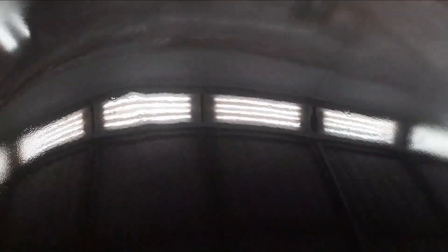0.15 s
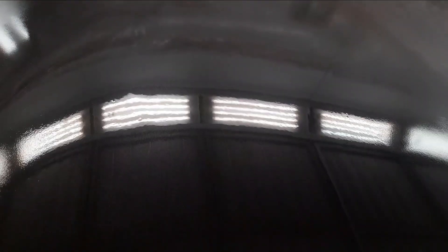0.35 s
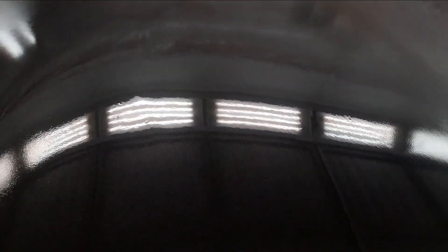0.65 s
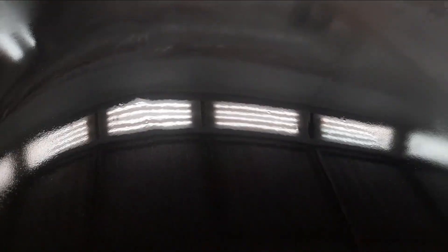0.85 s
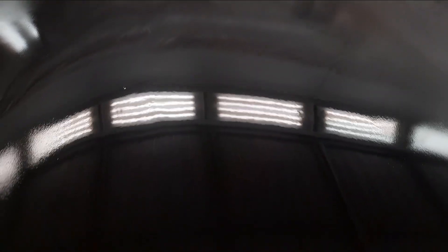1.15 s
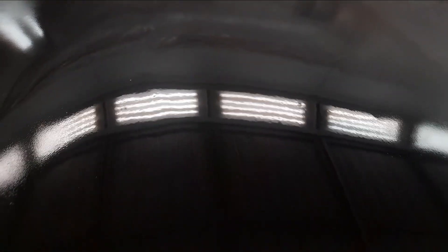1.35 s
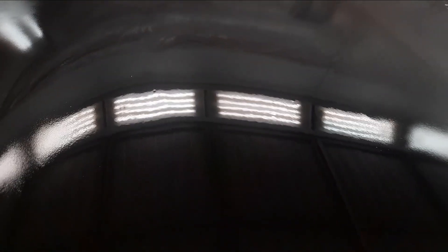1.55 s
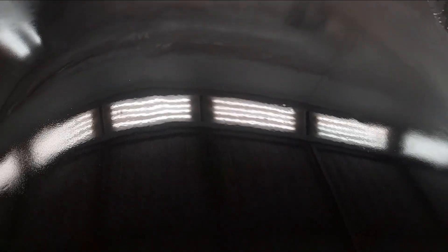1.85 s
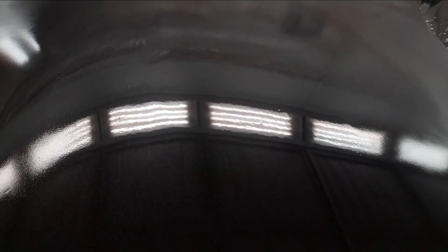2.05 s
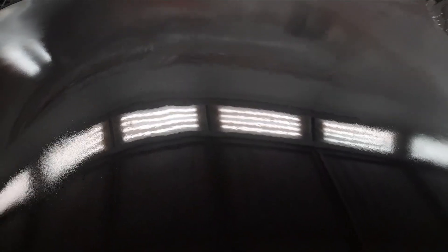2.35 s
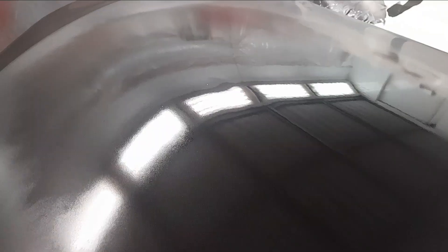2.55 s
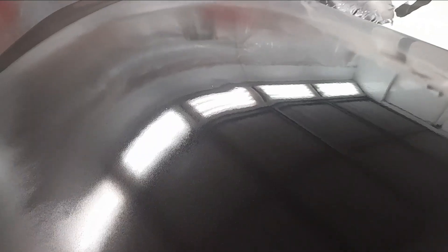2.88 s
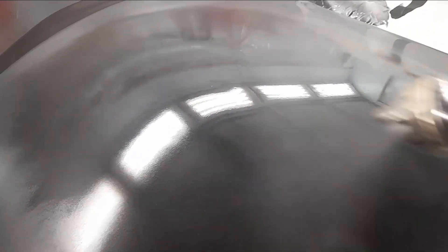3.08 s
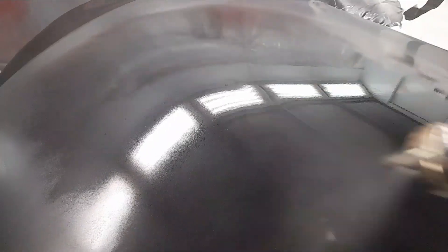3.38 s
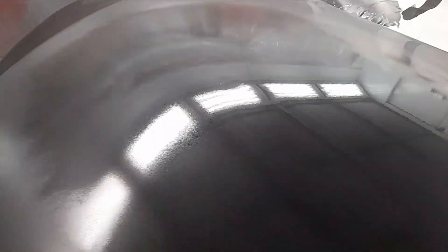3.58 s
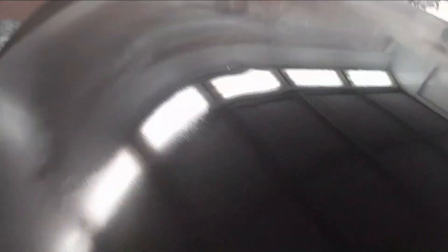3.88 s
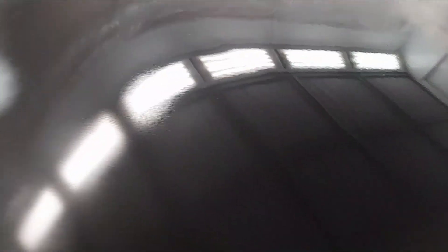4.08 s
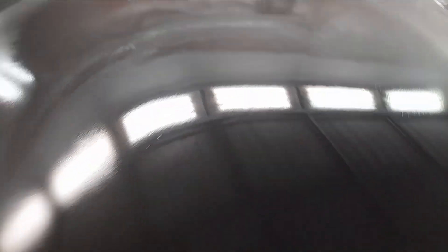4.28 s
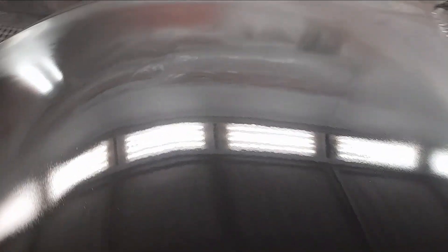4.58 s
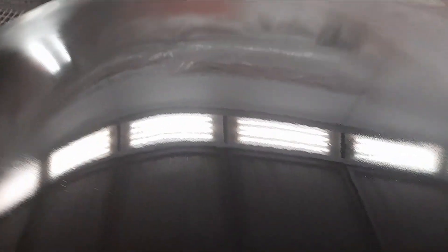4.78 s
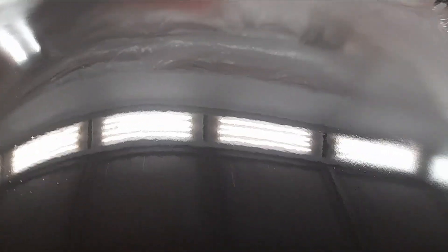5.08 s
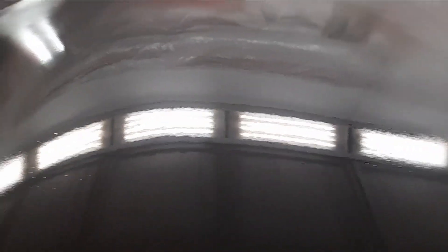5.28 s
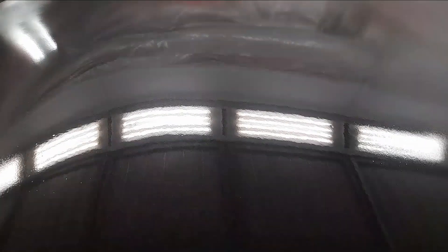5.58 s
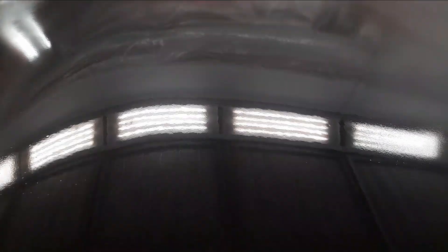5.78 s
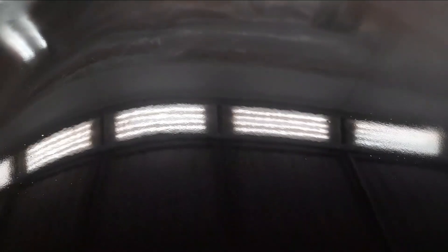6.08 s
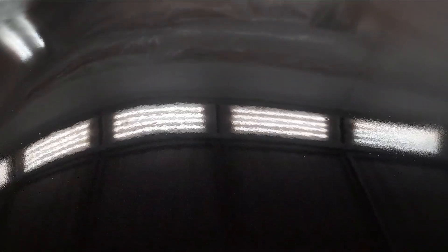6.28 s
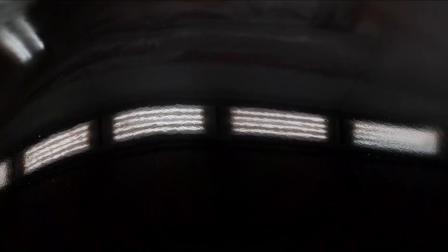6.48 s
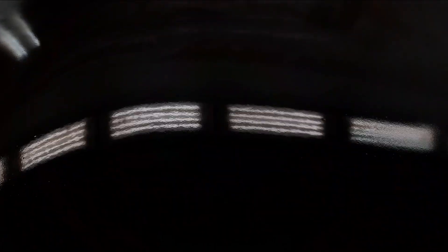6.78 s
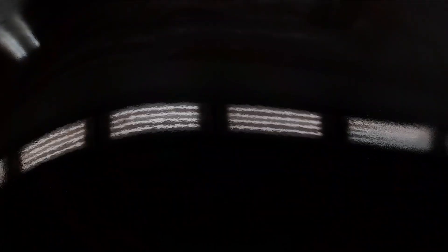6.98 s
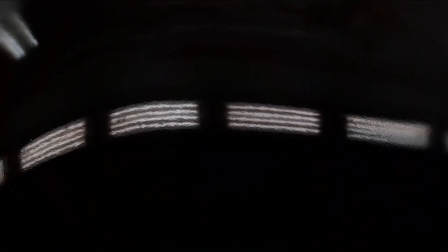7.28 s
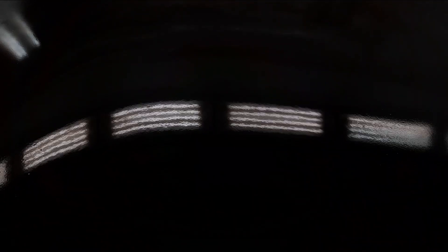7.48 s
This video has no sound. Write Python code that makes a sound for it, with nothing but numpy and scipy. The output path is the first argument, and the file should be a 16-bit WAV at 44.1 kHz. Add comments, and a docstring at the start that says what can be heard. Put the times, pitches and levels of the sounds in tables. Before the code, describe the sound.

A close stereo microphone in a ventilated workshop booth picks up dull airflow rumble, fan hum and a very quiet high hiss. Low puffs buffet it. A spray gun snaps on loudly, its bright hiss shifting in colour as it sweeps past, then shuts with a tiny spit. The room is briefly subdued, clicks sound hard left, and the rumble gradually returns with more puffs.

```python
"""A paint booth runs throughout: filtered noise for duct rumble and air, a wavering sine for the fan's hum.
From the start a spray gun leaks a thin combed hiss, and puffs of low noise buffet the microphone.
Near 3 s the gun sprays for about a second, sweeping close past: noise combed by a sliding panel echo.
The valve spits as it seats, leftover air bleeds off, then near 5 s a finger taps the case: ringing clicks.
The recorder's gain control ducks the booth under the burst, holds over a second, then lets it swell back."""
import sys
import numpy as np
from scipy import signal
from scipy.fft import rfft, irfft, next_fast_len
from scipy.io import wavfile
from scipy.ndimage import uniform_filter1d, minimum_filter1d

SR = 44100
rng = np.random.default_rng(int(sys.argv[2]) if len(sys.argv) > 2 else 0)


def transcribe(u):
    """Save the signal u as a 16-bit wav file named by the first command-line argument.

    u: samples, shape (n,) or (channels, n), limited to [-1, 1]; the rate is SR.
    q: integer samples, one column per channel.
    """
    v = np.clip(np.atleast_2d(u).T, -1, 1)
    q = np.round(v * 32767).astype(np.int16)
    wavfile.write(sys.argv[1], SR, q)


N = 336917
TIME = np.arange(N) / SR
FFT_SIZE = next_fast_len(N + 4096, real=True)
FREQS = np.maximum(np.arange(FFT_SIZE // 2 + 1) * SR / FFT_SIZE, 1)
CUTOFF_HZ = 15500


def from_db(db):
    """Decibels to gain."""
    return 10 ** (np.asarray(db) / 20)


def rms_one(x):
    """Scale to unit rms."""
    return x / np.sqrt(np.mean(x ** 2) + 1e-20)


def over_hz(points):
    """A table joined by straight lines on a log-frequency axis."""
    hz, value = np.transpose(points)
    return np.interp(np.log(FREQS), np.log(hz), value)


def in_time(rows):
    """The columns of a table, joined by straight lines in time."""
    start_s, *columns = np.transpose(rows)
    return [np.interp(TIME, start_s, column) for column in columns]


def bell(centre_hz, width_hz):
    """Resonance-shaped curve over frequency: 1 on top, full width taken at half height."""
    return 1 / (1 + (2 * (FREQS - centre_hz) / width_hz) ** 2)


def hump(peak_s, length_s):
    """A smooth rise to 1 at a given moment, and the same fall."""
    return np.exp(-((TIME - peak_s) / length_s) ** 2)


def opened(start_s, attack_s):
    """Air let in: 0 before, a straight rise to 1 over the attack."""
    return np.clip((TIME - start_s) / attack_s, 0, 1)


def dying(start_s, db_per_s):
    """Full strength until a given moment, then a steady fall in dB, down to -200 dB."""
    return from_db(-np.minimum(db_per_s * np.maximum(TIME - start_s, 0), 200))


def panned(balance_db):
    """Left and right gains for a left-minus-right difference, at constant power."""
    gains = from_db(np.array([[.5], [-.5]]) * balance_db)
    return gains / np.sqrt(np.mean(gains ** 2, axis=0))


def noise(gain, likeness=0):
    """Stereo turbulence with a given spectrum and left-right likeness; rms 1."""
    mid, side = rfft(rng.standard_normal((2, FFT_SIZE)))
    common = np.sqrt(1 + likeness) * mid
    opposed = np.sqrt(1 - likeness) * side * [[1], [-1]]
    return rms_one(irfft((common + opposed) * gain, FFT_SIZE)[:, :N])


def drift(rate_hz):
    """Slow random wander, rms 1, its spectrum halved at the given rate."""
    spectrum = rfft(rng.standard_normal(FFT_SIZE))
    return rms_one(irfft(spectrum * bell(0, 2 * rate_hz), FFT_SIZE)[:N])


def butter(x, edge_hz, kind, order=2):
    """Butterworth low- or high-pass."""
    return signal.sosfilt(signal.butter(order, edge_hz, kind, fs=SR, output="sos"), x)


def peak_band(x, centre_hz, width_hz):
    """The part of a sound that one resonance picks out."""
    return signal.lfilter(*signal.iirpeak(centre_hz, centre_hz / width_hz, fs=SR), x)


def delayed(x, lag_ms, oversampling=4):
    """A sound heard over a longer path, which may change; read on a finer grid to keep its treble."""
    fine = signal.resample_poly(x, oversampling, 1)
    position = (TIME - lag_ms / 1000) * SR * oversampling
    return np.interp(position, np.arange(len(fine)), fine)


# booth air, relative spectrum: (pitch_hz, level_db)
DRAUGHT_COLOUR = [(20, -39), (38, -12.5), (60, -2.5), (112, -4.5), (133, -12.5), (150, -12.5), (195, -9.5),
                  (250, -13), (350, -18.5), (600, -26.5), (1000, -26.5), (1450, -28.5), (1650, -28),
                  (1850, -26.5), (2150, -27), (2300, -30), (2480, -33), (2900, -37), (5000, -51),
                  (9000, -70)]
# duct resonances: (pitch_hz, width_hz, lift_db)
DUCT_MODES = [(60.2, 6.7, 4), (118, 8, 1.5), (154.2, 14.3, 6), (173, 8.1, 3.5), (240, 10, 0.5),
              (261, 10.4, 3.5), (307, 14, 1.5), (417.6, 33, 5), (495, 21, 5), (562, 15.6, 5.5),
              (693, 43, 7.5), (768, 23, 3.5), (840, 12, 2), (925, 29, 5), (974, 45, 4), (2120, 82, 1)]
# booth air at the two ports: (pitch_hz, likeness -1..1)
BOOTH_ALIKE = [(60, .92), (160, .92), (270, .88), (450, .74), (740, .68), (1150, .4), (2000, .2), (4000, 0)]
# booth air: (pitch_hz, left_minus_right_db)
BOOTH_PAN = [(60, 1.5), (130, 0), (270, 4), (450, 2), (1200, 0), (1900, 7.5), (3200, -3.5), (6000, 3)]
# extractor on the left, so its rush reaches that port first: (pitch_hz, left_lead_rad)
BOOTH_LEAD = [(300, 0), (700, 0.38), (1150, 1.52), (1500, 2.18), (2300, 1.5)]
DRAUGHT_DB = -23.5


def draught(gust_db):
    """Extracted air rumbles through the ducts: noise coloured by their resonances."""
    duct_db = sum(lift_db * bell(pitch_hz, width_hz) for pitch_hz, width_hz, lift_db in DUCT_MODES)
    colour = from_db(over_hz(DRAUGHT_COLOUR) + duct_db)
    arrival = np.exp(-1j * over_hz(BOOTH_LEAD) * [[0], [1]])
    air = noise(colour * panned(over_hz(BOOTH_PAN)) * arrival, over_hz(BOOTH_ALIKE))
    return from_db(DRAUGHT_DB + gust_db * drift(1.8)) * air


# bands of booth noise that swell for a while: (peak_s, length_s, pitch_hz, width_hz, level_db)
BAND_SWELLS = [(2.742, 0.28, 845, 170, -42.5), (4.1, 0.35, 695, 45, -41.5), (6.703, .7, 83, 30, -32)]


def swelling_bands(likeness):
    """Bands of booth noise come and go: hollow ones, then a low rumble."""
    out = np.zeros((2, N))
    for peak_s, length_s, pitch_hz, width_hz, level_db in BAND_SWELLS:
        band = noise(bell(pitch_hz, width_hz), likeness)
        out += from_db(level_db) * hump(peak_s, length_s) * band
    return out


# hum level over time, uneven, lower during the burst: (start_s, change_db)
HUM_LEVEL = [(0, 0), (.3, 2), (.75, -1), (1.1, 1), (1.55, -2), (2.4, 1.5), (2.93, 1), (3.08, -8),
             (3.35, -2), (4.1, -4), (4.8, -1), (5.2, -1.5), (5.75, 1), (6.08, -4), (6.4, 0), (7.45, 0.8)]
FAN_HZ, FAN_DB = 220.62, -27.5


def fan(waver, waver_hz, balance_db):
    """The steady blade tone; uneven inflow shakes its strength and phase a little."""
    change_db, = in_time(HUM_LEVEL)
    unsteady = 1 + waver * (drift(waver_hz) + 1j * drift(waver_hz))
    tone = np.real(unsteady * np.exp(2j * np.pi * FAN_HZ * TIME))
    return from_db(FAN_DB + change_db) * rms_one(tone) * panned(balance_db)


# moving air brushing the microphone: (peak_s, level_db, length_s)
AIR_PUFFS = [(0.214, -21.5, 0.056), (0.458, -13.5, 0.024), (0.716, -19, 0.025), (0.895, -20, 0.046),
             (2.125, -22, 0.04), (2.4, -25, 0.021), (2.498, -24, 0.025), (2.722, -33, 0.059),
             (5.427, -16, 0.022), (5.516, -22.5, 0.035), (5.721, -15, 0.017), (6.373, -17.5, 0.054),
             (7.49, -23, 0.048)]


def puffs(centre_hz, width_hz, likeness, balance_db):
    """Each puff is a brief swell of soft, low buffeting."""
    swell = sum(from_db(level_db) * hump(peak_s, length_s) for peak_s, level_db, length_s in AIR_PUFFS)
    buffeting = butter(noise(bell(centre_hz, width_hz), likeness), 56, "high", order=4)
    return swell * buffeting * panned(balance_db)


def ring(clicks, pitch_hz, t60_s):
    """A decaying resonator: a unit click sets a sine of height 1 ringing."""
    decay = from_db(-60 / (t60_s * SR))
    step_rad = 2 * np.pi * pitch_hz / SR
    return signal.lfilter([0, np.sin(step_rad)], [1, -2 * decay * np.cos(step_rad), decay ** 2], clicks)


# tap on the case by the left port, its rebound, a light touch: (start_s, tick_peak_db, brightness_hz)
CASE_TAPS = [(5.0589, -6, 5960), (5.0620, -13, 1700), (5.23, -20, 900)]
# ringing of the case, relative: (pitch_hz, level_db, t60_s)
CASE_MODES = [(108.5, -3, 0.092), (450, -29, 0.01), (1350, -21, .008), (2000, -21, .007), (4200, -28, .006),
              (5900, -24, 0.0043), (10400, -28, .004), (11640, -33, .006)]


def knock(balance_db):
    """Sharp contacts, each a tick followed by a short ring and a low thud."""
    out = np.zeros(N)
    for start_s, tick_peak_db, brightness_hz in CASE_TAPS:
        click = np.zeros(N)
        click[round(start_s * SR)] = 1
        tick = butter(click, brightness_hz, "low")
        body = sum(from_db(level_db) * ring(tick, pitch_hz, t60_s) for pitch_hz, level_db, t60_s in CASE_MODES)
        out += from_db(tick_peak_db) * (tick / tick.max() - body)
    return out * panned(balance_db)


# trigger: pulled once, held, let go
OPEN_S, ATTACK_S, CLOSE_S, RELEASE_DB_PER_S = 2.971, .009, 4.105, 700
THIN_HZ, THIN_WIDTH_HZ, THIN_START_DB, THIN_DB_PER_S = 9030, 1800, 4.5, 1.1


def thinning(x):
    """One band of a hiss starts strong and fades away."""
    band_gain = from_db(THIN_START_DB - THIN_DB_PER_S * TIME)
    return x + (band_gain - 1) * peak_band(x, THIN_HZ, THIN_WIDTH_HZ)


def bleed(level_db, fall_db_per_s):
    """Level of the extra air that bleeds off once the trigger is let go."""
    return from_db(level_db) * opened(CLOSE_S, ATTACK_S) * dying(CLOSE_S, fall_db_per_s)


# idle gun's leak, relative spectrum: (pitch_hz, level_db)
LEAK_SPECTRUM = [(2000, -18), (4000, -12), (6300, -11.5), (8400, -10), (9500, -6), (11200, -.5),
                 (13300, 3.5), (15500, 1.5)]
# leak at the two ports: (pitch_hz, left_minus_right_db)
LEAK_PAN = [(8000, -7.5), (11200, 2), (13300, 3.5), (15500, -12)]
# idle gun over the panel, air cap turning slowly:
# (start_s, hiss_change_db, left_minus_right_db, left_echo_lag_ms, right_echo_lag_ms)
GUN_PATH = [(0, 0, 0, 0.53, 0.25), (1.1, 0, -0.5, .45, .245), (1.35, 3, 2, .46, .26),
            (1.65, 2.5, 0, 0.44, 0.28), (2.05, 1, 1, .53, 0.3), (2.5, 1, 2, .55, 0.31),
            (2.9, -2, -2, .555, .328), (4.4, -4, -1, .45, 0.25), (5.1, -3, 3, 0.37, .26),
            (5.65, 0, 5, 0.45, .265), (6.25, -.5, 4, .415, 0.3), (6.5, 1, 6.5, .45, .275),
            (7.6, 1, 4, .45, 0.29)]
HISS_DB, BLEED_HISS_DB, BLEED_HISS_FALL_DB_PER_S = -49, -45, 31
# the rush fades as the gun draws away
RUSH_DB, RUSH_FADE_DB_PER_S = -60.5, 0.5
BLEED_RUSH_DB, BLEED_RUSH_FALL_DB_PER_S = -54, 8


def leak(flutter_db, rush_hz, rush_width_hz, rush_balance_db, echo_share):
    """A thin high hiss from the air cap, combed by its echo off the panel, over a slowly fading lower rush."""
    change_db, balance_db, *lags_ms = in_time(GUN_PATH)
    direct = noise(from_db(over_hz(LEAK_SPECTRUM)) * panned(over_hz(LEAK_PAN)))
    combed = np.array([side + echo_share * delayed(side, lag_ms) for side, lag_ms in zip(direct, lags_ms)])
    # idle and bled air add in power
    hiss_level = np.hypot(from_db(HISS_DB + change_db), bleed(BLEED_HISS_DB, BLEED_HISS_FALL_DB_PER_S))
    hiss = hiss_level * combed * panned(balance_db)
    idle_rush_level = from_db(RUSH_DB - RUSH_FADE_DB_PER_S * TIME)
    rush_level = np.hypot(idle_rush_level, bleed(BLEED_RUSH_DB, BLEED_RUSH_FALL_DB_PER_S))
    rush = rush_level * noise(bell(rush_hz, rush_width_hz)) * panned(rush_balance_db)
    return thinning(hiss + rush) * from_db(flutter_db * drift(12))


SPIT_S, SPIT_ATTACK_S, SPIT_DB, SPIT_DB_PER_S = 4.16, .0015, -31, 750


def spit(centre_hz, width_hz, balance_db):
    """The needle seats with a last sharp tick of air."""
    puff = from_db(SPIT_DB) * opened(SPIT_S, SPIT_ATTACK_S) * dying(SPIT_S, SPIT_DB_PER_S)
    return puff * noise(np.sqrt(bell(centre_hz, width_hz))) * panned(balance_db)


# pressure sags while the trigger is held; leftover air drains after it shuts
SAG_DB_PER_S, DRAIN_DB, DRAIN_DB_PER_S = 2.34, -16, 128


def valve():
    """Flow through the gun: it snaps on, sags a little, is cut off and drains."""
    cut_off = dying(CLOSE_S, RELEASE_DB_PER_S)
    drain = from_db(DRAIN_DB) * dying(CLOSE_S, DRAIN_DB_PER_S)
    return opened(OPEN_S, ATTACK_S) * dying(OPEN_S, SAG_DB_PER_S) * np.maximum(cut_off, drain)


# closest approach
PASS_S, PASS_LENGTH_S = 3.675, 0.24


def sweep(far, closest):
    """A quantity that follows the gun's nearness, which falls with the square of its distance."""
    nearness = 1 / (1 + ((TIME - PASS_S) / PASS_LENGTH_S) ** 2)
    return far + (closest - far) * nearness


def glints(x, share, count=4):
    """Weak reflections from hand, gun and panel leave a slight ripple in the colour."""
    lags = (rng.uniform(.001, .004, count) * SR).astype(int)
    return x + share * sum(np.roll(x, lag) for lag in lags)


def churned(x, depth_db, rate_hz, count=12):
    """Eddies make each band of a jet surge and sink on its own."""
    place = np.interp(FREQS, [1500, CUTOFF_HZ], [0, count - 1])
    spectrum = rfft(x, FFT_SIZE)
    out = np.zeros((2, N))
    for k in range(count):
        overlap = np.maximum(1 - np.abs(place - k), 0)
        band = irfft(spectrum * overlap, FFT_SIZE)[:, :N]
        out += band * from_db(depth_db * drift(rate_hz))
    return out


# spraying jet, relative spectrum: (pitch_hz, level_db)
JET_SPECTRUM = [(300, -17), (1200, -8.5), (1850, -2), (2400, -3), (3000, -5), (3900, -1.0), (4800, -3),
                (6000, 2.5), (7200, 4.5), (8100, 4.5), (9200, -0.5), (11300, 3), (13300, 2.5), (15500, 1.5)]
# jet at the two ports: (pitch_hz, left_minus_right_db)
JET_PORT_PAN = [(1000, 0), (1800, 2.5), (3200, -1.5), (4700, -2.5), (6200, 3), (7200, 9), (8000, 5.5),
                (9200, 0), (11000, -2), (13000, -3), (15500, -8)]
# share of the jet common to both ports, the rest diffuse: (pitch_hz, likeness 0..1)
JET_ALIKE = [(1000, 0.7), (2000, 0.7), (2900, 0.9), (3900, 0.55), (4800, .3), (6200, 0.3), (11000, 0.3),
             (15000, 0.1)]
# each pair: gun far, gun closest; levels before the valve's sag
JET_DB, SIZZLE_DB = (-15, -13.5), (-36, -19)
JET_PAN_DB, ECHO_LAG_MS = (-2, -0.5), (0.35, 0.89)
# gun on the right, so its direct sound reaches the left port later
PORT_LAG_MS = (0.527, 0.262)


def spray(echo_share, sizzle_hz, sizzle_width_hz, sizzle_balance_db, flutter_db):
    """The jet's hiss; its echo off the panel, on the left, combs it with notches that slide as the gun moves."""
    colour = from_db(over_hz(JET_SPECTRUM))
    left, right = noise(colour * panned(over_hz(JET_PORT_PAN)), over_hz(JET_ALIKE))
    left = delayed(left, sweep(*PORT_LAG_MS))
    dull = butter(left, 6400, "low")
    left = left + echo_share * delayed(dull, sweep(*ECHO_LAG_MS))
    scattered = np.array([glints(side, share=.08) for side in (left, right)])
    jet = from_db(sweep(*JET_DB)) * scattered * panned(sweep(*JET_PAN_DB))
    # a narrower band flares up as the fan of air glances off the panel towards the microphone
    glancing = noise(bell(sizzle_hz, sizzle_width_hz) * panned(sizzle_balance_db))
    sizzle = from_db(sweep(*SIZZLE_DB)) * glancing
    burst = (jet + sizzle) * valve() * from_db(flutter_db * drift(25))
    return churned(burst, depth_db=.65, rate_hz=16)


def scene():
    """Booth and gun together, with wind and taps at the microphone."""
    booth = draught(gust_db=0.23) + swelling_bands(likeness=1.0)
    hum = fan(waver=0.12, waver_hz=5, balance_db=-1.0)
    wind = puffs(centre_hz=65.4, width_hz=70, likeness=0.89, balance_db=4.5)
    taps = knock(balance_db=37)
    idle = leak(flutter_db=0.5, rush_hz=5900, rush_width_hz=2600, rush_balance_db=3.5, echo_share=0.23)
    seating = spit(centre_hz=8510, width_hz=10000, balance_db=6)
    burst = spray(echo_share=0.27, sizzle_hz=6600, sizzle_width_hz=2400, sizzle_balance_db=9, flutter_db=0.12)
    return booth + hum + wind + taps + idle + seating + burst


def port(x, centre_hz, width_hz, depth):
    """The small cavity in front of a microphone swallows one treble band."""
    return x - depth * peak_band(x, centre_hz, width_hz)


def gain_control(x, threshold_db, ahead_s, hold_s, release_db_per_s):
    """Loud treble pulls the gain down just ahead of itself; the gain is held, then creeps back."""
    treble = butter(x, 8000, "high")
    power = uniform_filter1d(np.mean(treble ** 2, axis=0), size=400)
    excess_db = np.maximum(10 * np.log10(np.abs(power) + 1e-12) - threshold_db, 0)
    excess_db = np.interp(TIME + ahead_s, TIME, excess_db)
    hold = int(hold_s * SR)
    # largest excess over the past hold time
    held_db = -minimum_filter1d(-excess_db, hold, origin=(hold - 1) // 2, mode="nearest")
    # a running maximum on a rising ramp limits how fast the cut may shrink
    ramp_db = release_db_per_s * TIME
    cut_db = np.maximum.accumulate(held_db + ramp_db) - ramp_db
    return x * from_db(-cut_db)


# notch of each port, left then right: (centre_hz, width_hz, depth 0..1)
PORT_NOTCHES = [(8050, 3000, .99), (8200, 900, 0.45)]


def record(dry):
    """Microphone ports, gain control, softened ends, then a steep cut of the top."""
    heard = np.array([port(side, *notch) for side, notch in zip(dry, PORT_NOTCHES)])
    levelled = gain_control(heard, threshold_db=-23.5, ahead_s=.003, hold_s=1.21, release_db_per_s=26.5)
    ends = np.minimum(np.minimum(TIME, TIME[-1] - TIME) / .003, 1)
    steep_cut = signal.ellip(12, .1, 90, CUTOFF_HZ, fs=SR, output="sos")
    return signal.sosfilt(steep_cut, levelled * ends)


dry = scene()
out = record(dry)
transcribe(out)
```